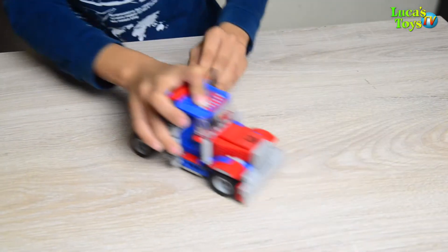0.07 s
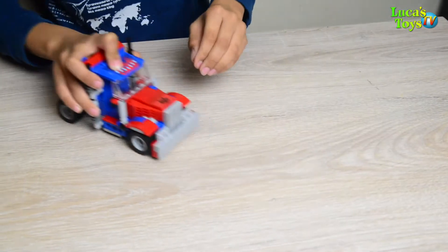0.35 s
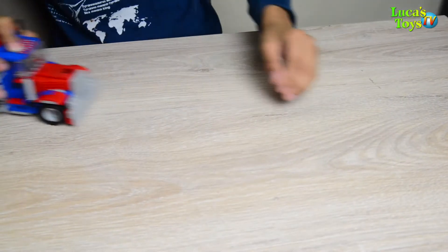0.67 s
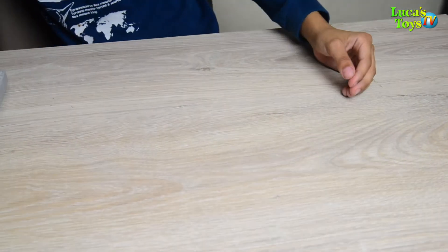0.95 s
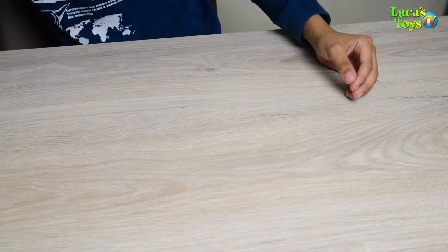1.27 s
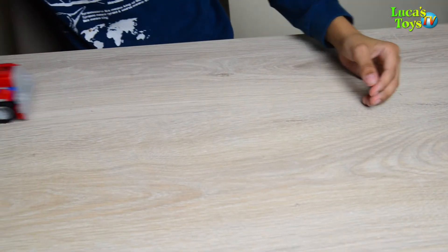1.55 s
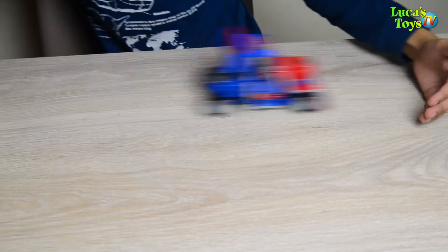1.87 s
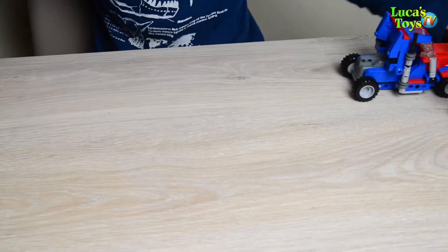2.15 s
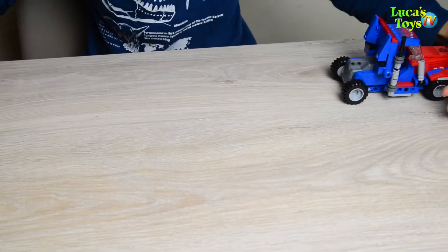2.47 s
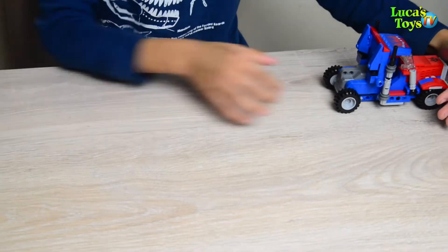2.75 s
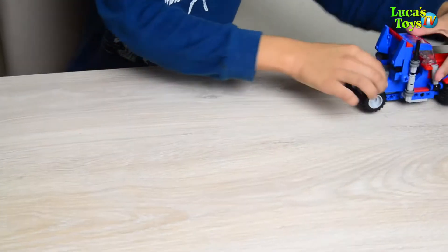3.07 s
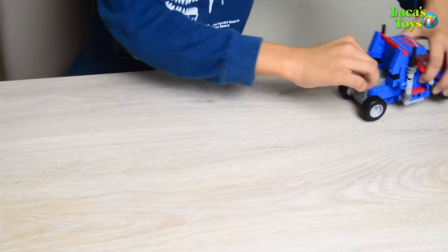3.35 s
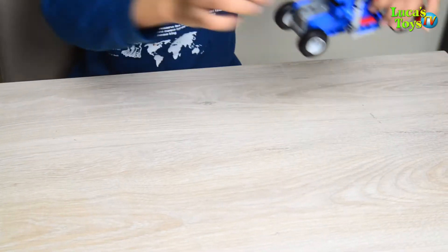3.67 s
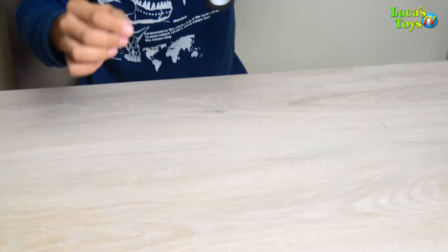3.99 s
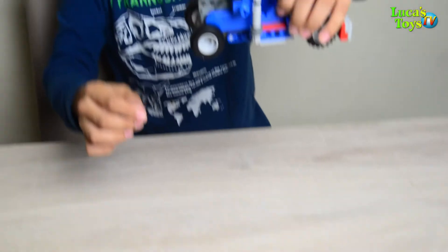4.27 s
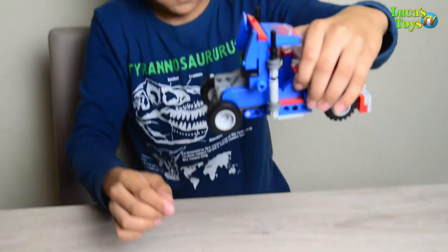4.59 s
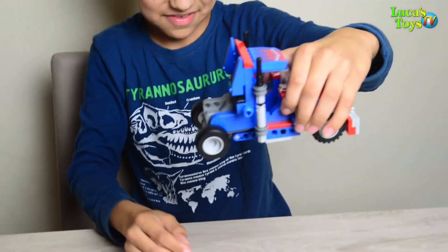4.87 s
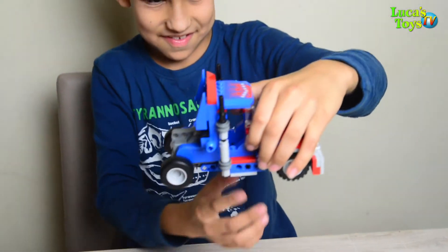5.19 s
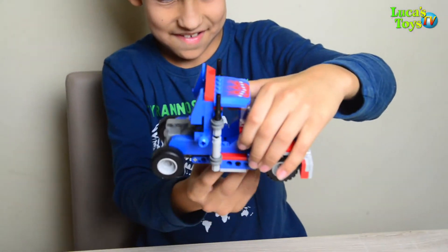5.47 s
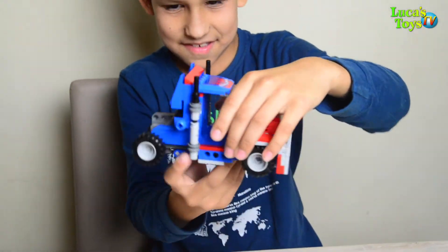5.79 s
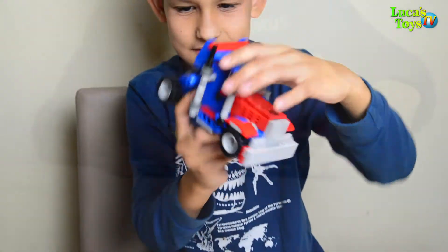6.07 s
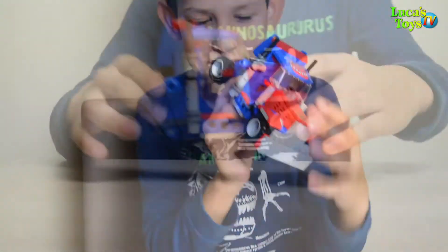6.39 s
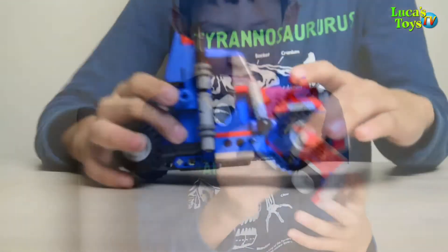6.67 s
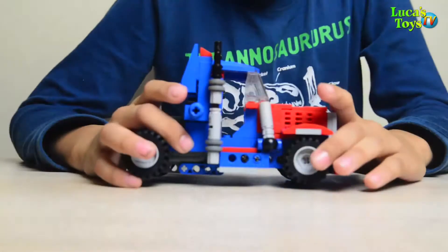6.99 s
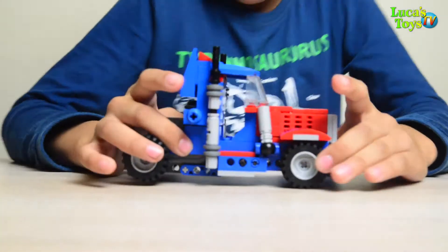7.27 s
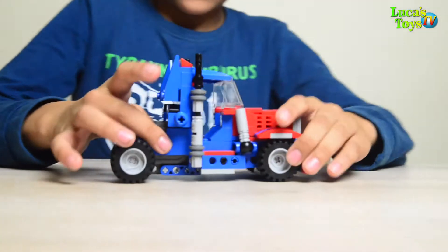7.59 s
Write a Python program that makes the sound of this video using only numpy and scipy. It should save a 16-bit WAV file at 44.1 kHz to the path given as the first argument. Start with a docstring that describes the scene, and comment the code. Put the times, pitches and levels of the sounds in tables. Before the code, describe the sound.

Gears of a pull-back toy truck rattle on wood, then its spring motor whirs and slowly dies away amid plastic knocks.

```python
"""Loose bricks click and gears rattle as a plastic pull-back truck is drawn over a wooden table.
It is held, let go, caught and lifted; its spring motor whirrs down in the air, and it is set down again.
Tooth impacts excite the housing and tyre treads drive the modes of the table top, both louder with speed.
Knocks, bumps, snaps and rubbing accompany the handling, in a small quiet room with a faint late hiss."""
import sys
import numpy as np
from scipy import signal
from scipy.fft import rfft, irfft
from scipy.io import wavfile

SR = 44100
rng = np.random.default_rng(int(sys.argv[2]) if len(sys.argv) > 2 else 0)


def to_wav(s):
    """Save 16-bit WAV."""
    ch = np.atleast_2d(s).T  # columns
    pcm = np.round(np.clip(ch, -1, 1) * 32767)  # PCM
    wavfile.write(sys.argv[1], SR, pcm.astype(np.int16))


N = 345744
TIME = np.arange(N) / SR
REFERENCE_SPEED = 60  # shaft speed [turns/s] at which the level laws are stated


# Response of the housing to the unloaded gears: (frequency [Hz], level [dB])
HOUSING_SPECTRUM = [(600, -53), (1000, -22), (1550, -39), (1800, -5.5), (2200, -7.5), (3000, -4.5),
                    (3400, -4), (4100, -2.5), (4800, -4), (6300, -7.5), (7100, -17), (7700, -22),
                    (8500, -36.5), (15500, -61)]
# Modes of the gearbox shell: (frequency [Hz], level [dB], t60 [s])
GEARBOX_MODES = [(1868, -10, 0.013), (3013, -3, 0.066), (3220, -20.5, 0.03), (3620, -7, 0.031),
                 (4066, 3.5, 0.021), (4322, 0, 0.025), (4980, -14, 0.013), (6240, -9, 0.032)]
# Low clatter: (lower edge [Hz], upper edge [Hz], relative level [dB], loss per halving of speed [dB])
CLATTER_BANDS = [(676, 2200, -26, 21), (1216, 2340, -20, 1)]
def free_motor():
    """Impact excitation: the spring races the lifted gears, then constant friction slows them evenly."""
    release_s, run_up_s, stop_s, top_turns_per_s = 3.388, .09, 5.857, 68
    pace = curve([(release_s, 0), (release_s + run_up_s, 1), (stop_s, 0)])
    speed = top_turns_per_s * pace
    push = bell(3.53, width_s=.11)  # the spring's last push drives the teeth harder
    clicks = teeth(np.maximum(speed, 10), per_turn=24, scatter_db=3.5, wobble_db=1.24, slack=.35)
    clicks = unit(clicks + undb(1) * chatter(clicks, t60=.03))
    housing = unit(colour(clicks, HOUSING_SPECTRUM))
    shell = unit(through(chatter(clicks, t60=.0041), ring(GEARBOX_MODES)))
    whirr = unit(housing + undb(-4.5) * shell)
    for lo_hz, hi_hz, db, loss_db in CLATTER_BANDS:
        clatter = unit(band(clicks, lo_hz, hi_hz, order=3))
        whirr += clatter * undb(db + loss_db * np.log2(pace + 1e-9) + 4 * push)
    # the first loose turns are thin: the low ring sets in as the spring takes hold
    thin = unit(band(chatter(clicks, t60=.004), 2800, 5800, order=3)) * undb(-1)
    fullness = ramp(release_s, rise_s=.11)
    whirr = fullness * whirr + (1 - fullness) * thin
    whirr *= by_speed(speed, db=-20, db_per_doubling=8) * undb(4.5 * push)
    fizz = unit(colour(clicks, [(5000, -32), (8000, -2), (11000, -4), (15500, -16)]))
    fizz *= by_speed(speed, db=-40, db_per_doubling=15, ceiling_db=-38)
    fizz *= undb(1.04 * walk(60)) * ramp(release_s, rise_s=.15)
    return (whirr + fizz) * undb(.7 * walk(35))


# Shaft speed while the truck is drawn back: (time [s], speed [turns/s])
PULL_BACK_SPEED = [(0, 20.3), (.2, 18.7), (.43, 13), (.51, 23.5), (.575, 21.8), (.66, 53), (.73, 49),
                   (.82, 27), (.93, 27.62), (1.04, 9.4), (1.2, 4.2)]
# Shaft speed while it runs free on the table: (time [s], speed [turns/s])
RUN_SPEED = [(1.47, 4), (1.56, 14.15), (1.72, 27.7), (1.84, 34.2), (1.975, 36.7), (2.035, 57), (2.11, 44),
             (2.23, 17.1), (2.45, 4.6)]
# Response of the chassis to the loaded gears: (frequency [Hz], level [dB])
CHASSIS_SPECTRUM = [(300, -17.5), (550, 5.5), (850, 0.5), (1100, 0), (1600, 0), (2400, 2), (3100, -1),
                    (4100, -1), (5000, -8.5), (6300, -12), (7200, -20.5), (8300, -37), (11000, -32),
                    (15500, -38)]
def driving(table):
    """Forced vibration: loaded gear teeth shake the chassis while tyre treads drum on the table."""
    speed = np.maximum(curve(PULL_BACK_SPEED + RUN_SPEED), 1)
    held = TIME < PULL_BACK_SPEED[-1][0]
    clicks = teeth(speed, per_turn=22, scatter_db=4.5, wobble_db=1, slack=.35)
    clicks += undb(5.5) * chatter(clicks, t60=.075)
    # faster teeth strike harder and brighter, most of all when the spring drives them
    sizzle = unit(band(chatter(clicks, t60=.0032), 2520, 5770, order=3))
    sizzle *= by_speed(speed, db=3, db_per_doubling=7.5) * undb(-5 * held)
    chassis = unit(colour(clicks, CHASSIS_SPECTRUM))
    gears = (chassis + sizzle) * by_speed(speed, db=-17.5, db_per_doubling=16.5)
    treads = teeth(speed, per_turn=12, scatter_db=3, wobble_db=3.5, slack=.226)
    drum = unit(through(treads, table)) * by_speed(speed, db=-12, db_per_doubling=18.17, ceiling_db=-24.5)
    rumble = unit(band(treads, 107, 176, order=3))
    rumble *= by_speed(speed, db=-27.5, db_per_doubling=12.4, ceiling_db=-44.5)
    rumble *= undb(5.5 * held)  # the hand bears down on the truck
    return gears, drum + rumble + booms(speed)


# Modes of the wooden top: (frequency [Hz], level [dB], t60 [s])
TABLE_MODES = [(121.7, -16, 0.75), (194, -17.5, 0.36), (268.2, -2.5, 0.84), (287, -0.5, 0.23),
               (330, -6.5, 0.47), (361, -3, 0.39), (405, -0.5, 0.53), (416, -2, 0.3), (459.36, 1, 0.29),
               (514, -12, 0.3), (591, -4, 0.048), (634, -6.5, 0.18), (708.3, -24, 0.057),
               (765, -11.5, 0.103), (870.4, -7.5, 0.054)]
def table_top():
    """Modal superposition: the impulse response of a plate is a sum of damped sinusoids."""
    return ring(TABLE_MODES)


# Booming table modes, by name: (frequency [Hz], waver [Hz], relative hum level [dB], t60 [s])
RESONANCES = {"low": (265.5, 4.5, 0.5, 0.44), "middle": (294.5, 7, -1, 0.04),
              "high": (359, 10, -0.5, 0.3739)}
# Wheels crossing an antinode: (time [s], level [dB], swell width [s], mode name)
ANTINODE_CROSSINGS = [(.06, -33.5, 0.018, "high"), (.165, -34, 0.028, "low"), (0.311, -32.5, 0.043, "low"),
                      (0.522, -27, .035, "low"), (.74, -29, 0.035, "high"), (0.864, -22.5, 0.017, "high"),
                      (.93, -32, .03, "high"), (1.73, -33.5, 0.019, "high"), (1.84, -22, 0.0431, "middle"),
                      (1.899, -18, 0.029, "high"), (1.985, -16.5, 0.037, "low"), (2.169, -21.5, 0.1, "low")]
def booms(speed):
    """Resonance: a table mode hums under the treads, swells when driven at an antinode, then rings out."""
    out = np.zeros(N)
    hum = by_speed(speed, db=-17, db_per_doubling=15.8, ceiling_db=-37)
    for name, (hz, waver_hz, hum_db, t60) in RESONANCES.items():
        power = (hum * undb(hum_db)) ** 2
        for s, db, swell_s, mode in ANTINODE_CROSSINGS:
            if mode == name:
                envelope = np.where(TIME < s, bell(s, swell_s), release(s, t60))
                power += (undb(db) * envelope) ** 2
        pitch_hz = hz + waver_hz * walk(40)  # uneven pushes make the mode waver
        out += np.sqrt(power) * unit(oscillator(pitch_hz))
    return out


# Response of the struck plastic body: (frequency [Hz], level [dB])
PLASTIC_SPECTRUM = [(300, -18), (800, -6), (1600, -4), (2400, 2.5), (3200, 2), (4100, 3), (5000, -1),
                    (6300, -5), (7500, -17.5), (10000, -27.5), (15500, -49)]
def knock(db, tilt_db, t60, ping_db):
    """Free decay after impact: a tick, a short rattle of the shell and the ping of one loose brick."""
    blow = diffuse(t60) + undb(-4.5) * diffuse(.0026)
    tilted = [(hz, level + tilt_db * np.log2(min(hz, 6000) / 3000)) for hz, level in PLASTIC_SPECTRUM]
    ping_hz = 2395 * (1 + .035 * rng.standard_normal())
    sound = unit(colour(blow, tilted)) + undb(ping_db) * unit(tone(ping_hz, 2.3 * t60))
    onset = 1 - fade(.12 * t60)  # looser parts take longer to start rattling
    return at_peak(sound * onset, db)


# Blows on the body: (time [s], relative level [dB], tilt [dB/octave], t60 [s], ping against rattle [dB])
BODY_KNOCKS = [(0.0481, -22, -3.5, 0.013, 3), (0.135, -23.5, 2, 0.0176, -12),
               (0.4662, -32, -7.5, 0.018, -6), (.5914, -19, 3.5, 0.029, -6), (.65, -13.5, 3, 0.044, -16),
               (.727, -13.5, 2, .04, -19), (1.2007, -35, 15, 0.031, -12), (1.514, -39, 0, .11, -12),
               (1.5395, -18, 9.5, 0.018, -22), (2.033, -10.5, 5, .05, -20), (2.8423, -37, -3, 0.037, -3),
               (2.9889, -22.5, -4, 0.15, -26), (3.152, -23, -2.5, 0.26, -9),
               (3.1968, -11.5, -4, 0.0323, -8), (3.207, -19, -1, 0.11, -16), (5.5854, -28, -4, 0.058, -10),
               (5.9491, -24.5, 5.5, 0.038, -14), (6.1608, -31.5, -11, 0.044, -21),
               (6.2009, -25, -1, 0.032, -17), (6.7062, -18.5, -1, .035, -6), (6.7296, -18.5, -1, .018, -14),
               (6.7454, -24, -3, .02, -18), (6.7647, -20, -6, 0.02, -5), (6.778, -22.5, -0.5, .02, -15),
               (7.2107, -27, -2.5, 0.13, -18), (7.4283, -26, -2.5, 0.032, -8),
               (7.6171, -21.5, -1.5, 0.037, -15), (7.634, -28.5, -3, 0.056, -18),
               (7.818, -27, 0, 0.074, -21)]
# Runs of brick clicks: (start [s], duration [s], relative level [dB], ping against rattle [dB])
BRICK_RATTLES = [(0, .11, -29, -7), (0.146, .11, -35.5, -7), (6.785, .025, -26, -4), (7.39, .13, -37.5, -4)]
def knocks():
    """Rigid collisions: single blows on the body, and uneven runs of clicks from loose bricks."""
    out, gap_s = np.zeros(N), .026
    for s, db, tilt_db, t60, ping_db in BODY_KNOCKS:
        add(out, s, knock(db, tilt_db, t60, ping_db))
    for start, length, db, ping_db in BRICK_RATTLES:
        for s in np.arange(start, start + length, gap_s):
            delay_s = gap_s * rng.random() / 2
            click_db = db + 4 * rng.standard_normal()
            add(out, s + delay_s, knock(click_db, tilt_db=-.5, t60=.013, ping_db=ping_db))
    return out * undb(1)


# Low modes of the whole table: (frequency [Hz], level [dB], t60 [s])
THUD_MODES = [(49.86, -3.5, 0.54), (86, -6.5, 0.14), (125.5, 5, 0.77)]
# Wheels bumping the table: (time [s], peak level [dB], frequency [Hz], t60 [s], thud against bounce [dB])
WHEEL_BUMPS = [(2.755, -31.5, 259.6, 0.8, 0.5), (3.152, -20, 395.3, 0.052, -16),
               (3.198, -22.5, 271.7, 0.23, -4), (5.711, -40, 330, 0.215, -6), (6.705, -22, 282, 0.074, -9),
               (6.762, -24.5, 207.5, 0.049, -4.5), (6.824, -28.5, 493, .02, -3),
               (7.017, -28, 185, 0.12, -29), (7.212, -16.5, 368, 0.045, -41), (7.232, -24.5, 354, .11, -32),
               (7.309, -29, 311.4, 0.42, -26.5), (7.417, -23.5, 324, .066, -5),
               (7.617, -18, 324, 0.073, -26.5), (7.64, -18.5, 355, .12, -25), (7.645, -30, 602, 0.089, -25)]
def bumps(table):
    """Damped oscillation: the truck bounces on its tyres, and the table rings and thuds under its weight."""
    out, thud = np.zeros(N), unit(ring(THUD_MODES))
    cushion = 1 - fade(.00466)  # rubber softens the first touch
    for s, db, hz, t60, thud_db in WHEEL_BUMPS:
        bounce = unit(tone(hz, t60))
        rattle = unit(band(diffuse(.029), 220, 530))
        sound = bounce + undb(-9.5) * (unit(table) + rattle) + undb(thud_db) * thud
        add(out, s, at_peak(sound * cushion, db))
    return out


# Tiny dry snaps: (time [s], relative level [dB], lower mode [Hz])
DRY_SNAPS = [(5.7072, -10.5, 3480), (7.761, -21, 3640), (7.7784, -19.5, 3230), (7.799, -13, 3240)]
def snaps():
    """Heavy damping: two modes die within about ten milliseconds and are heard as a tick."""
    out = np.zeros(N)
    for s, db, hz in DRY_SNAPS:
        modes = tone(hz, t60=.01) - tone(1.37 * hz, t60=.0093)
        add(out, s, at_peak(band(modes, 2100, 9400, order=3), db))
    return out * undb(-1.5)


# Scraped plastic: (frequency [Hz], level [dB])
SCRAPE_SPECTRUM = [(500, -8.5), (1200, 5.5), (2600, -1), (4200, -0.5), (6000, -10.5), (8000, -18.5),
                   (15000, -45)]
# Hands shifting the truck: (start [s], duration [s], rub level [dB], scrape level [dB])
HAND_MOVES = [(2.741, 0.2, -49.5, -51.5), (3.152, 0.11, -39.5, -40.5), (5.553, 0.18, -48.5, -48.5),
              (6.71, 0.19, -40.5, -41.5), (6.95, 0.46, -48, -49.5), (7.313, 0.11, -38, -43),
              (7.49, 0.53, -44.5, -50.5)]
def handling():
    """Sliding friction: small uneven slips of fingers and tyres give a dull rub and a brighter scrape."""
    slips = rng.standard_normal(N) * undb(1.25 * walk(90))
    rub = unit(colour(slips, [(30, -17.5), (50, -23), (80, -20.5), (125, -2.5), (200, -1.5),
                              (300, -2.5), (420, -8.5), (600, -12.5), (1200, -12), (4000, -55.5)]))
    scrape = unit(colour(slips * undb(1.77 * walk(700)), SCRAPE_SPECTRUM))
    out = np.zeros(N)
    for s, length, rub_db, scrape_db in HAND_MOVES:
        envelope = ramp(s, rise_s=.03) * release(s + length, t60=.55)
        out += envelope * (undb(rub_db) * rub + undb(scrape_db) * scrape)
    return out


def room(x, wet_db, t60):
    """Reverberation: a small furnished room adds a diffuse tail, duller than the direct sound."""
    tail = diffuse(t60)
    tail *= ramp(0, rise_s=.0035)[:len(tail)]
    return x + undb(wet_db) * through(x, band(tail, 130, 4900, order=1))


# Still room air: (frequency [Hz], level [dB])
AIR_SPECTRUM = [(15, -62), (25, -13.5), (91, -6), (194, -4), (248, -7.5), (342, -8.5), (473, -11.5),
                (620, -12), (1040, -13.5), (1320, -13), (1550, -17), (2730, -16), (6140, -21.5),
                (7030, -29), (15800, -33)]
# Swells of a faint narrow hiss: (time [s], level [dB], width [s])
FAINT_SWELLS = [(6.8, -48, 0.238), (7.75, -48.5, 0.56)]
def background():
    """Filtered noise: broadband room air, and a narrow hiss that swells twice and drifts up in pitch."""
    air = unit(colour(rng.standard_normal(N), AIR_SPECTRUM)) * undb(-50.5 + walk(4.458))
    low_noise = signal.sosfilt(signal.butter(2, 280, fs=SR, output="sos"), rng.standard_normal(N))
    centre_hz = 4170 + 340 * (TIME - FAINT_SWELLS[0][0])
    hiss = unit(low_noise * oscillator(centre_hz))
    return air + hiss * sum(undb(db) * bell(s, width_s) for s, db, width_s in FAINT_SWELLS)


def teeth(speed, per_turn, scatter_db, wobble_db, slack):
    """Impulse train: one click a tooth, jittered by backlash, harder once a turn of the eccentric shaft."""
    turns = np.cumsum(speed) / SR
    at = np.flatnonzero(np.diff(np.floor(turns * per_turn)))
    force, timing, polarity = rng.standard_normal((len(at), 3)).T
    level_db = scatter_db * np.clip(force, -2, 2) + wobble_db * np.cos(2 * np.pi * turns[at])
    size = np.sign(polarity) * undb(level_db) / np.sqrt(speed[at])
    late = (slack * timing * SR / (speed[at] * per_turn)).astype(int)
    return unit(np.bincount(np.clip(at + late, 0, N - 1), size, N))


def chatter(clicks, t60):
    """Energy decay: each click shakes the loose parts and leaves a short noisy tail."""
    retained = np.exp(-2 * np.log(1000) / (t60 * SR))
    energy = signal.lfilter([1], [1, -retained], clicks ** 2 + 1e-18)
    return unit(np.sqrt(energy) * rng.standard_normal(N))


def by_speed(speed, db, db_per_doubling, ceiling_db=None):
    """Power law: gain grows with shaft speed and saturates at the ceiling, if one is given."""
    gain = undb(db + db_per_doubling * np.log2(speed / REFERENCE_SPEED + 1e-9))
    return gain if ceiling_db is None else gain / np.hypot(1, gain / undb(ceiling_db))


def ring(modes):
    """Impulse response of (frequency [Hz], level [dB], t60 [s]) modes, energy 1."""
    y = sum(rng.choice([-1, 1]) * undb(db) * tone(hz, t60) / np.sqrt(t60) for hz, db, t60 in modes)
    return y / np.linalg.norm(y)


def tone(hz, t60):
    """Damped sinusoid of one struck mode."""
    return fade(t60) * np.sin(2 * np.pi * hz * TIME[:SR // 3])


def diffuse(t60):
    """Modal overlap: countless close modes decay together as noise, energy 1."""
    y = fade(t60) * rng.standard_normal(SR // 3)
    return y / np.linalg.norm(y)


def oscillator(hz):
    """Sinusoid whose phase is the integral of frequency."""
    return np.sin(2 * np.pi * np.cumsum(hz) / SR)


def colour(x, points):
    """Minimum-phase filter through (frequency [Hz], level [dB]) points."""
    size = 4096
    hz, db = np.transpose(points)
    gain = undb(np.interp(np.log(np.fft.rfftfreq(size, 1 / SR) + 1), np.log(hz), db))
    cepstrum = irfft(np.log(gain))
    cepstrum[1:size // 2] *= 2
    cepstrum[size // 2 + 1:] = 0
    return through(x, irfft(np.exp(rfft(cepstrum))))


def through(x, response):
    """Convolution with an impulse response."""
    return signal.oaconvolve(x, response)[:len(x)]


def band(x, lo_hz, hi_hz, order=2):
    """Band-pass filter."""
    return signal.sosfilt(signal.butter(order, [lo_hz, hi_hz], "band", fs=SR, output="sos"), x)


def fade(t60):
    """A third of a second of exponential decay."""
    return np.exp(-np.log(1000) * TIME[:SR // 3] / max(t60, 1e-3))


def release(s, t60):
    """Gain 1 until time s, then exponential decay."""
    return np.exp(-np.log(1000) * np.maximum(TIME - s, 0) / t60)


def ramp(s, rise_s):
    """Linear rise from 0 to 1, starting at time s."""
    return np.clip((TIME - s) / rise_s, 0, 1)


def bell(s, width_s):
    """Bell-shaped swell peaking at time s."""
    return np.exp(-((TIME - s) / width_s) ** 2)


def curve(rows):
    """Linear interpolation of (time [s], value) points."""
    return np.interp(TIME, *np.transpose(rows))


def walk(rate_hz):
    """Smooth random fluctuation, rms 1."""
    knots = np.arange(0, TIME[-1] + 1 / rate_hz, 1 / rate_hz)
    return unit(np.interp(TIME, knots, rng.standard_normal(len(knots))))


def undb(db):
    """Decibels to amplitude ratio."""
    return 10 ** (np.asarray(db) / 20)


def unit(x):
    """Normalisation to rms 1."""
    return x / np.sqrt(np.mean(x ** 2))


def at_peak(x, db):
    """Normalisation to a peak level."""
    return undb(db) * x / np.abs(x).max()


def add(out, s, sound):
    """Superposition of a sound at time s."""
    i = int(s * SR)
    out[i:i + len(sound)] += sound[:N - i]


def scene():
    """Superposition: everything on and above the table sums at one nearby microphone."""
    table = table_top()
    gears, rolling = driving(table)
    motor = room(gears + free_motor(), wet_db=-8.5, t60=.38)
    blows = room(knocks() + bumps(table), wet_db=-2, t60=.36)
    return (motor + blows + rolling + handling() + snaps() + background())[None]


def record(dry):
    """Band limiting: a steep low-pass removes the treble above 15.7 kHz."""
    return signal.sosfilt(signal.ellip(10, .1, 80, 15700, fs=SR, output="sos"), dry)


dry = scene()
out = record(dry)
to_wav(out)
```